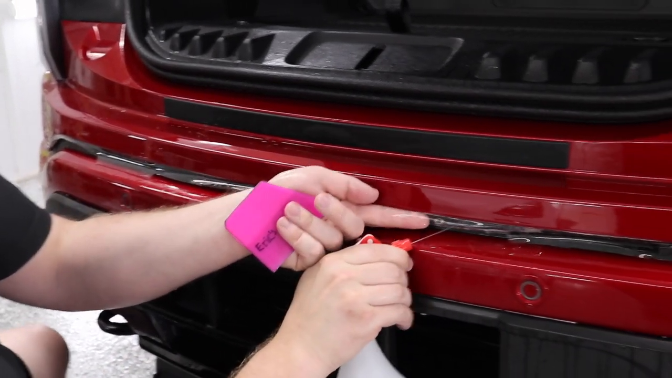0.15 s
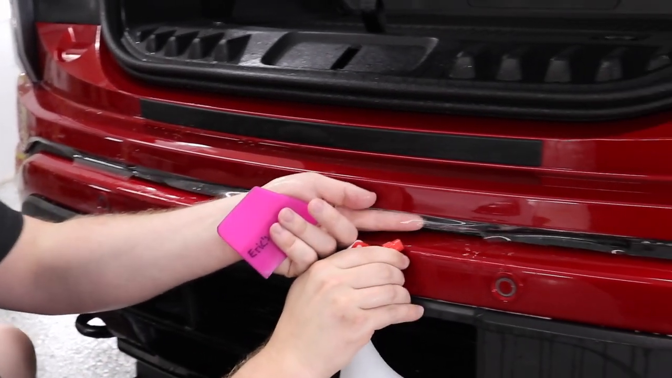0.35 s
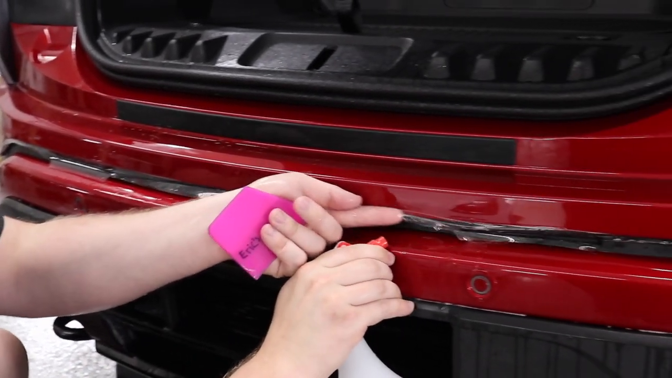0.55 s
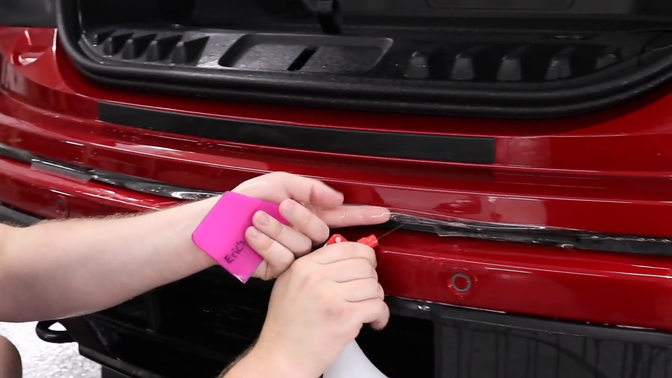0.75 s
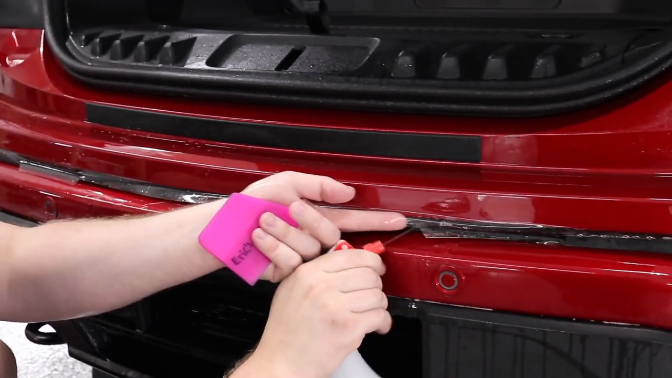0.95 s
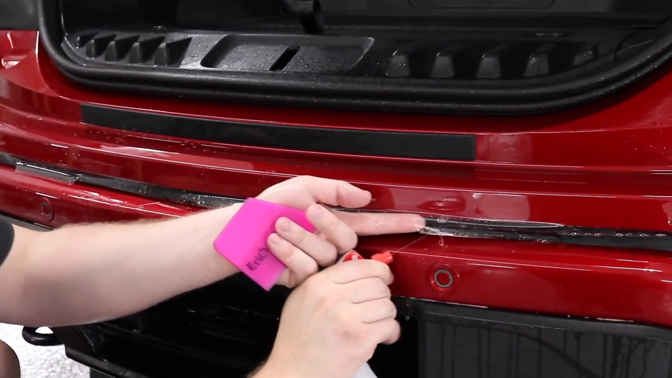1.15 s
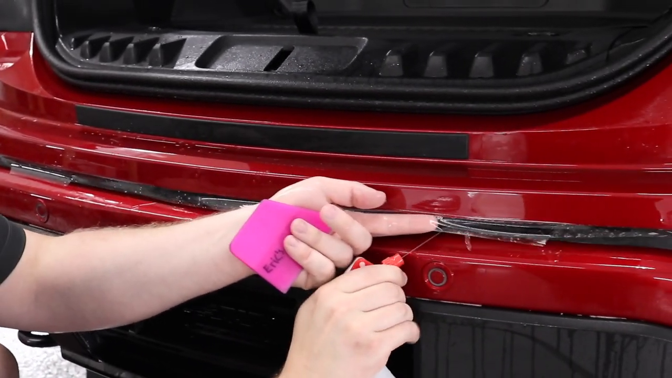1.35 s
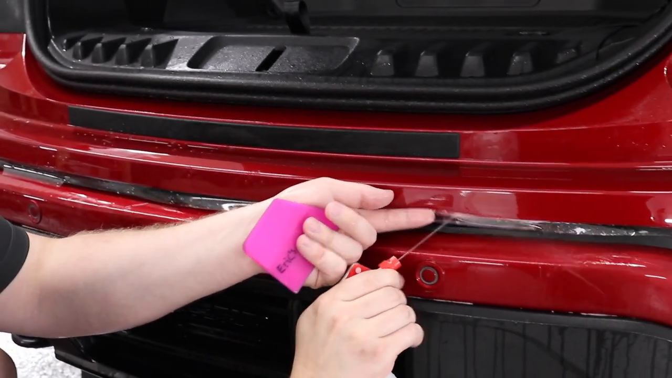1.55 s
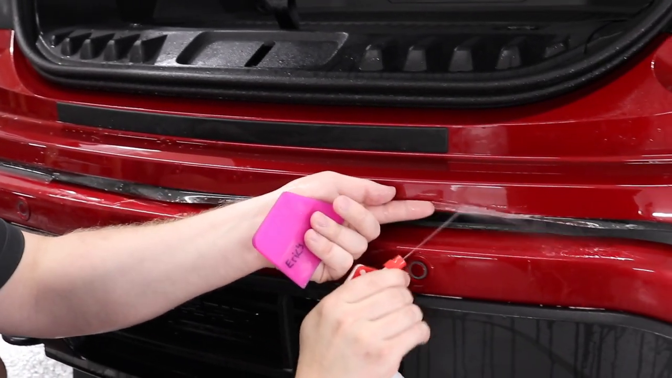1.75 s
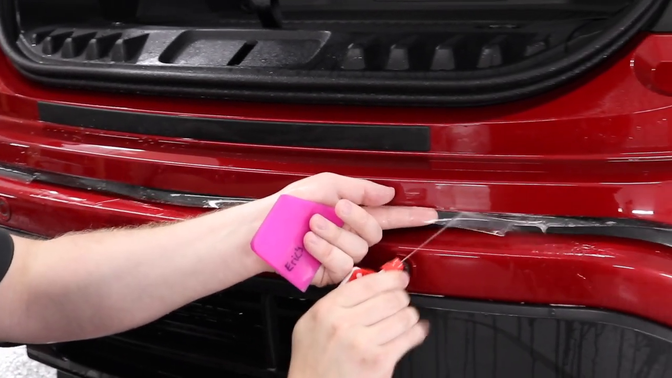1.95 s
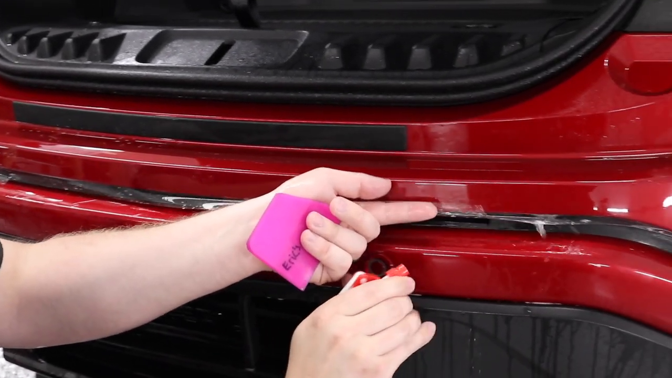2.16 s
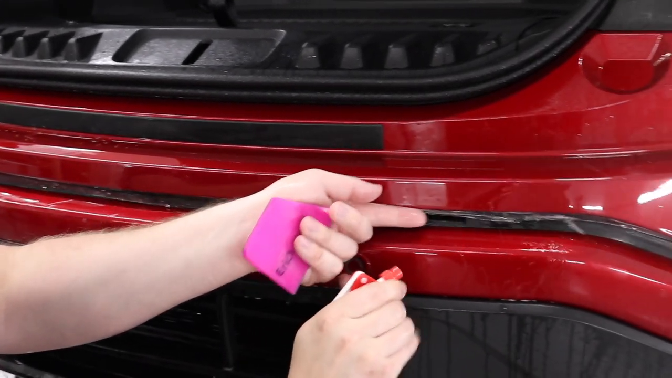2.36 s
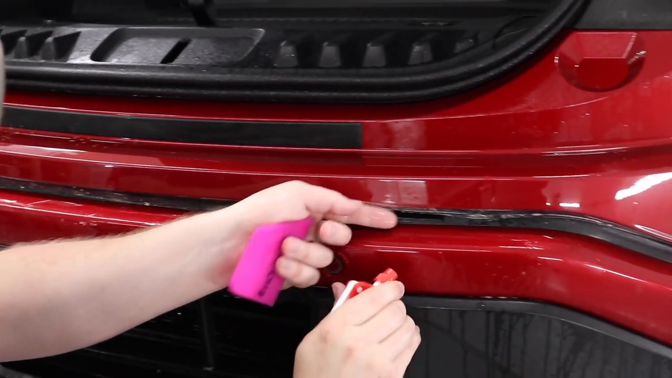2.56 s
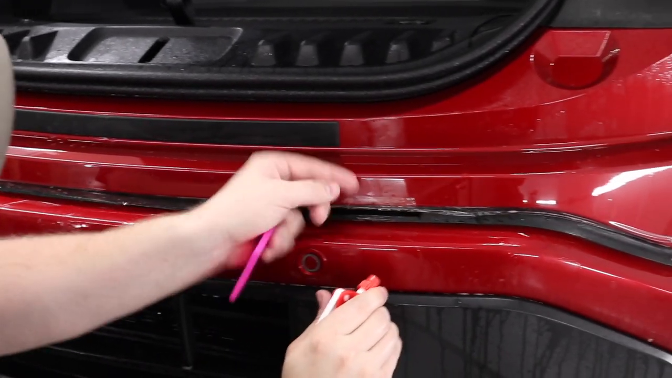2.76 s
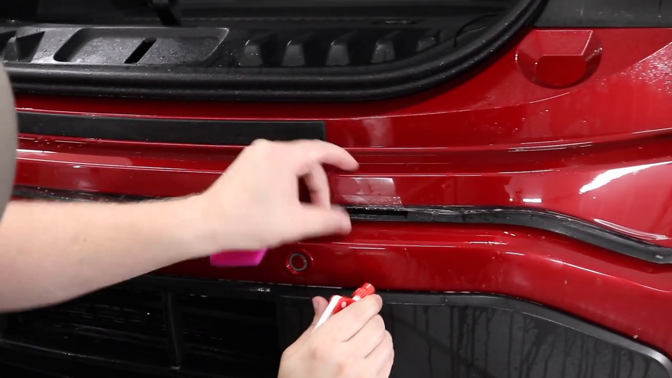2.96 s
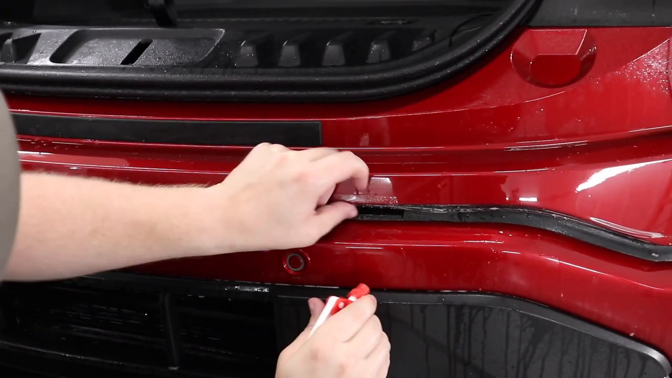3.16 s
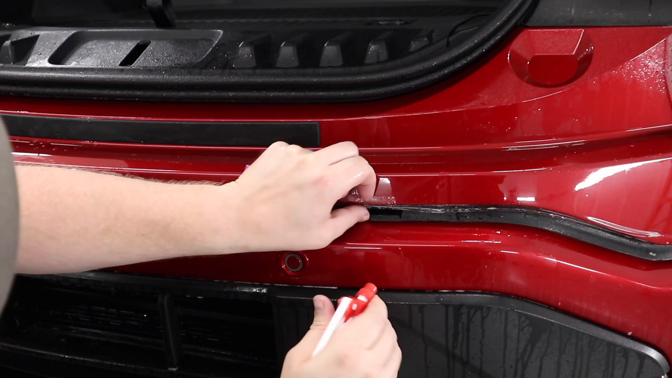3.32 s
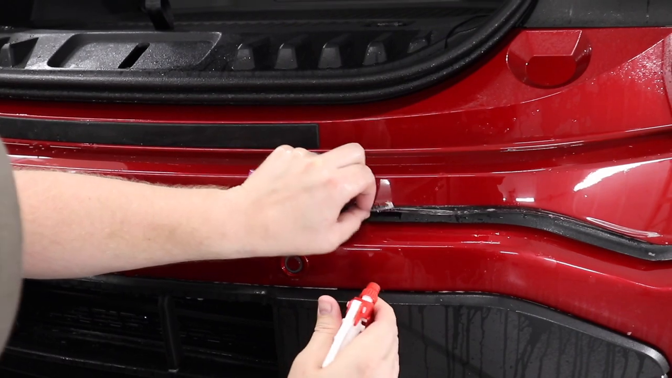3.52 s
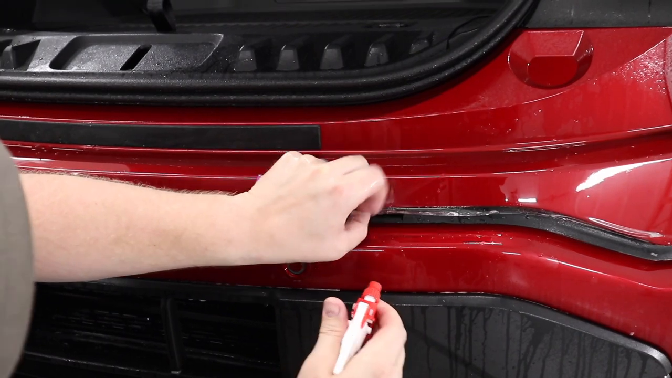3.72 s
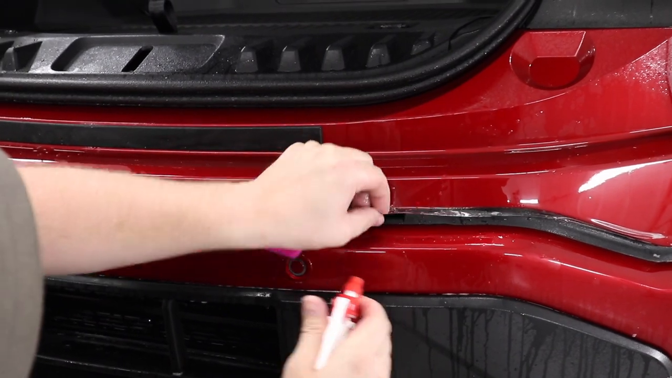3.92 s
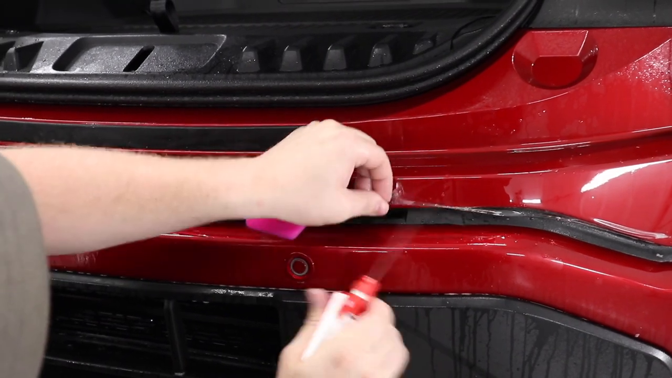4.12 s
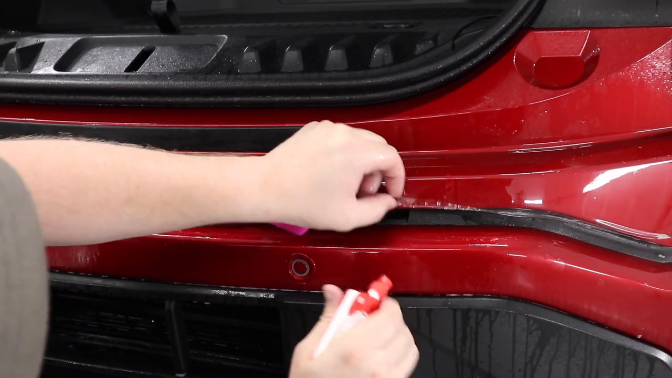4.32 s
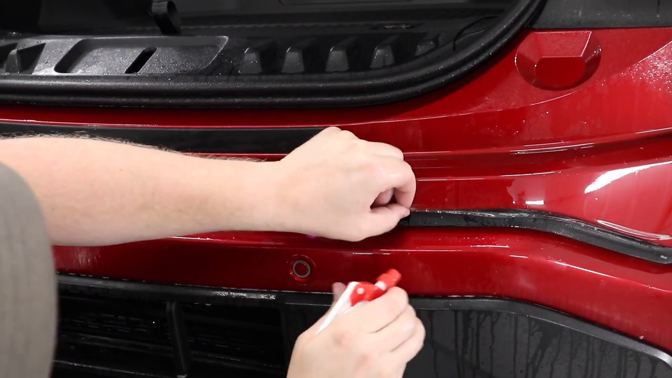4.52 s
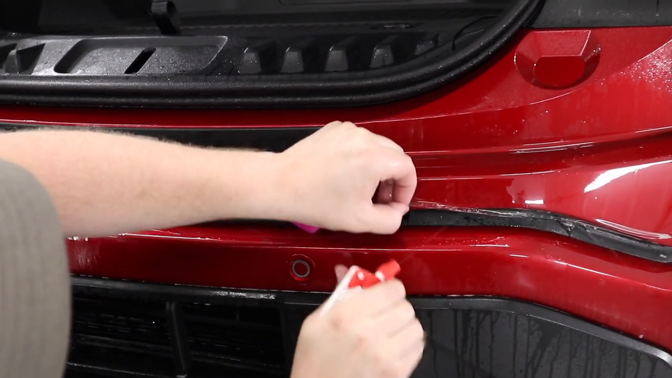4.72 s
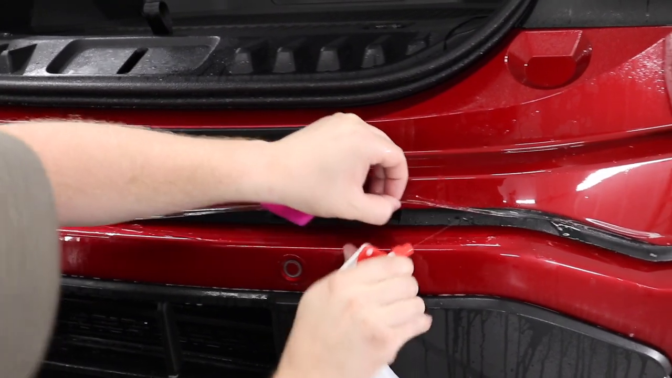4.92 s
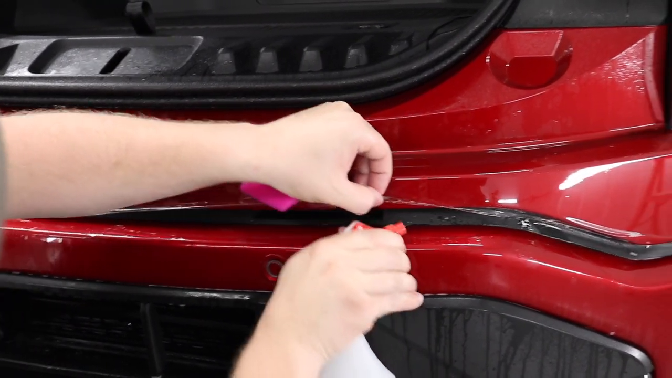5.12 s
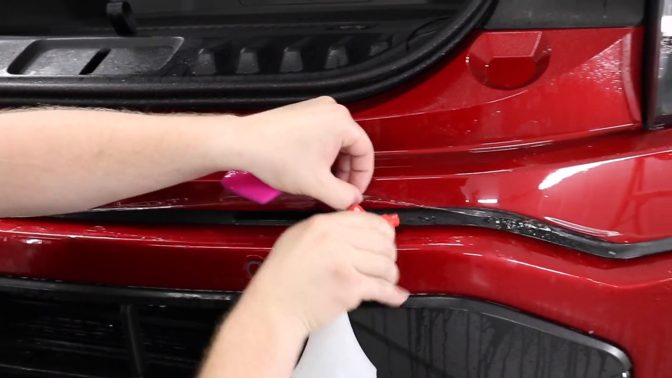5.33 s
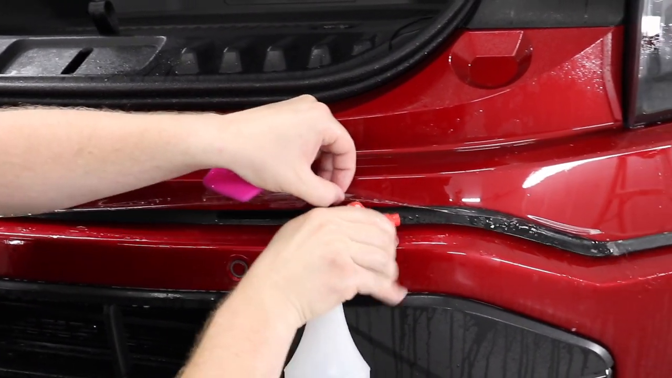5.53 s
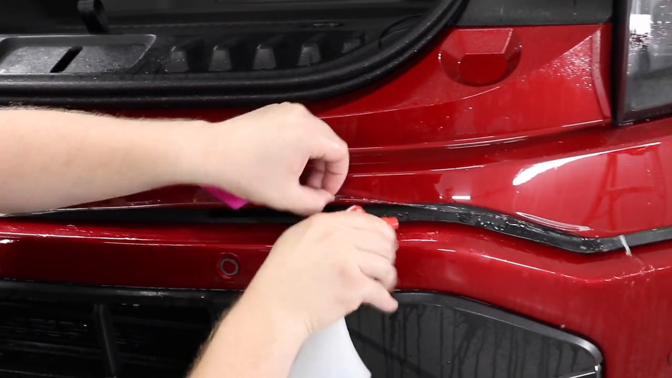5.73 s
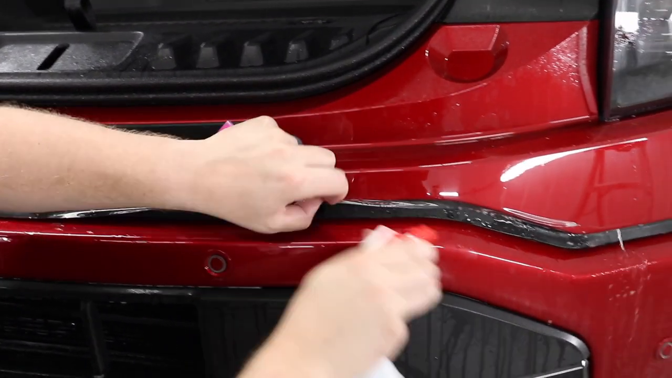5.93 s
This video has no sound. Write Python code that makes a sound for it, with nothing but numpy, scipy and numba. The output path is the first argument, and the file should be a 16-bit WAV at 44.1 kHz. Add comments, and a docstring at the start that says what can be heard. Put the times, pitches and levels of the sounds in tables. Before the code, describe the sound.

In a hard-walled workshop, a squeegee rubs and squeaks over wet film some way off while hands shuffle a plastic bottle. Close to the microphone, the trigger clicks and spits quick wet hisses onto a car panel, about five a second. The spraying pauses for light ticks, resumes in sparser, softer spurts, and ends with squeaks, scrapes, hollow knocks and a small metallic jingle. Faint lamp hum lies beneath.

```python
"""A squeegee scrapes some way off and low shuffles of hands and bottle start the take, over humming lamps.
Close to the microphone a trigger bottle knocks, ticks and sprays short jets at a car panel.
Loose metal jingles, wet rubber squeaks and something whines faintly, all in a hard-walled workshop.
Jets, scrapes and shuffles are shaped noise, knocks and jingles are decaying sines,
ticks are short noise bursts and squeaks are gliding tones with narrow noise."""
import sys
import numpy as np
from scipy import signal
from scipy.fft import rfft, irfft, next_fast_len
from scipy.io import wavfile
from scipy.ndimage import uniform_filter1d, map_coordinates
from numba import njit

SR = 44100
rng = np.random.default_rng(int(sys.argv[2]) if len(sys.argv) > 2 else 0)


def output_pcm(signal):
    """Save a mono or channel-first signal as 16-bit PCM at the path in sys.argv[1].

    Samples are clipped to [-1, 1] before scaling.
    """
    pcm = np.clip(np.atleast_2d(signal).T, -1, 1) * 32767
    wavfile.write(sys.argv[1], SR, np.round(pcm).astype(np.int16))


N = 268128
T = np.arange(N) / SR

# Workshop air. Each row: frequency in Hz, relative density in dB.
AIR_SPECTRUM = [(20, -34.5), (40, -5.5), (100, -2), (250, 3), (500, -7), (1000, -10.5), (1700, -43),
                (2200, -14.5), (3300, -15), (4000, -22.5), (6000, -25.5), (10000, -32), (16000, -40.5)]
AIR_DB = -63
# Lamp hum lines. Each row: frequency in Hz, rms level in dB.
HUM_LINES = [(118.4, -77), (236.9, -74), (1017, -81), (2762, -75), (2821, -78), (3348, -84)]
# Squeegee passes and softer rustles of wet film. Each row: start in s, rise in s, length in s,
# opening relative in dB, fade in dB per s, level in dB, blade resonance in Hz,
# resonance relative in dB, bright edge relative in dB.
SCRAPES = [(0, 0.16, 0.25, -6, 120, -32.5, 1720, -21, -8),
           (0.313, 0.0088, 0.034, -5, 100.5, -29, 1700, -10, -14),
           (0.361, .055, 0.059, -6.5, 200, -29.5, 1920, -26, -8),
           (.513, 0.038, 0.049, -9, 300, -20, 1648, -1.5, -8),
           (0.613, .03, 0.12, -6, 148, -30, 1690, -22, -15),
           (0.756, 0.022, 0.087, -13, 150, -26.5, 1600, -21, -15.5),
           (1.042, 0.11, 0.11, -8, 115, -43, 1766, -25, -7.5),
           (1.275, .05, .06, -6, 140, -50.5, 1840, -30.5, -9),
           (2.439, 0.0086, .015, -18.5, 449, -36, 1250, -18.5, -6),
           (2.5, 0.053, .09, -2.5, 91, -49, 1410, -21.5, -13),
           (2.653, .012, .015, -14, 450.5, -43.5, 1416, -28, 0),
           (2.71, 0.018, .04, -5.5, 30, -57, 1496, -25, -4),
           (5.463, 0.012, 0.026, 0, 500, -42.5, 2050, -6, -16),
           (5.513, 0.044, 0.054, -11, 69, -25.5, 1860, -31, -13.5),
           (5.76, 0.024, 0.029, -8, 503, -28, 1620, -26, -19),
           (5.82, 0.06, 0.063, -4.5, 280, -34, 1900, -20, -11.5),
           (5.954, 0.017, 0.014, -28, 400, -34, 1430, -1, 3),
           (6.009, 0.035, .08, -10, 200, -28.5, 2070, -12, -11)]
# Broad scratch, then bright edge of the blade. Each row: frequency in Hz, relative density in dB.
SCRATCH_SPECTRUM = [(100, -26), (300, -15.5), (600, -7.5), (1300, -3.5), (1900, -2), (2900, 2.5),
                    (4300, -9.5), (7000, -38.5), (12000, -60), (16000, -52)]
EDGE_SPECTRUM = [(1500, -42), (3500, 7.5), (5000, 3), (7000, -9.5), (10000, -21.5), (16000, -46)]
# Low shuffles of hands and liquid in the bottle. Each row: start in s, length in s, level in dB,
# upper rattle relative in dB, thump relative in dB.
SHUFFLES = [(0, 0.04, -40.5, -4, -8), (.045, 0.055, -36.5, -5.5, -13.5), (0.1, 0.092, -40, -4, -13),
            (0.198, 0.1, -37, -4, -15), (0.314, 0.1, -48, 5, -12.5), (1.148, 0.026, -48.5, -2, -25),
            (1.254, 0.23, -60, 2, -6), (1.517, .04, -50, -9, -27), (1.627, 0.027, -52, -12, 0),
            (1.832, 0.06, -51.5, 0.5, -8), (1.917, 0.12, -54, -3, -8), (2.05, 0.076, -52, -1, -8.5),
            (2.116, 0.21, -56, -6, -5.5), (2.332, 0.042, -51, 1.5, -23), (2.423, 0.052, -44, 2.5, -9),
            (2.536, 0.032, -41, -1.5, -10), (2.65, 0.024, -49.5, 2, -18.5), (2.722, 0.14, -55.5, -5, -15),
            (2.878, 0.025, -53.5, 1.5, -16.5), (2.98, 0.028, -55, -10, -20.5),
            (5.934, 0.067, -34.5, -0.5, -11), (5.988, .08, -39, -2, -10)]
# Middle, upper and lowest resonances of the shuffled body.
# Each row: frequency in Hz, width of each filter pass in Hz, relative level in dB.
HOLLOW_MODES = [(433, 184, 2), (536, 150, -4), (290, 180, -9.5)]
RATTLE_MODES = [(829, 230, 0.83), (1198, 150, -1.8)]
THUMP_MODES = [(129, 59, 7), (163, 44, 0.5), (212, 26, -7)]
# Hollow knocks of the bottle and trigger stop. Each row: start in s, peak in dB, pitch in Hz.
KNOCKS = [(.058, -28.5, 440), (.3, -35.5, 373), (1.058, -40.5, 238), (1.189, -41.5, 534), (1.264, -42, 236),
          (1.521, -35, 513), (1.647, -39.5, 453), (1.72, -44.5, 226), (1.864, -39.5, 462),
          (1.958, -36, 1240), (2.059, -40, 524), (2.114, -40, 457), (2.334, -38.5, 444),
          (2.362, -39.5, 546), (2.442, -37, 870), (2.547, -40, 550), (2.614, -38.5, 847), (2.657, -35, 524),
          (2.722, -43, 520), (2.899, -47, 550), (2.985, -43, 329), (3.362, -48, 301), (3.594, -51, 230),
          (4.071, -53, 256), (4.788, -30.5, 530), (4.829, -50, 229), (5.139, -50.5, 382), (5.385, -42, 222),
          (5.579, -34, 606), (5.945, -26.5, 473), (5.968, -25, 493), (6.008, -23, 553)]
# Modes of the hollow plastic. Each row: multiple of the pitch, relative level in dB.
BOTTLE_MODES = [(1, 3), (1.75, -10), (2.35, -8.5)]
# Jolts of small metal parts. Each row: start in s, level in dB before a common trim.
JINGLES = [(0.0787, -49), (2.4444, -45), (2.6614, -50), (5.968, -36), (6.0094, -47), (6.0344, -49),
           (6.0566, -47)]
# Modes of the metal parts. Each row: frequency in Hz, average level in dB, 60 dB decay time in s.
METAL_MODES = [(5000, 0.5, .06), (7480, -0.5, .2), (10500, -3.5, 0.2), (11500, -4, 0.21),
               (13150, -10.5, .08)]
# Ticks of trigger, film and fingers. Each row: start in s, level in dB, centre in Hz,
# treble crack relative in dB.
TICKS = [(.1087, -33, 2380, -8.5), (.128, -32, 7500, -12), (.158, -33, 6200, -20), (.2344, -24, 3330, -27),
         (.2606, -24, 1670, -19), (.283, -28.5, 5500, -22), (0.8626, -22, 1350, -31),
         (1.059, -30.5, 1950, -3), (1.1872, -27.5, 4670, -32), (1.2668, -31, 2690, -7),
         (1.4727, -38, 2770, -9), (1.492, -30, 2690, -19.5), (1.5246, -21.5, 2460, -13),
         (1.724, -32, 3780, -7), (1.867, -23, 4400, -11), (1.9438, -32, 2310, -5),
         (2.1162, -23.5, 4630, -21.5), (2.1964, -37.5, 4300, -4), (2.362, -26, 4320, -20),
         (2.4444, -25, 1180, -19.5), (2.6614, -32.5, 1220, -7), (2.888, -40.5, 890, -19.5),
         (2.9064, -38.5, 3700, -18.5), (3.1964, -46, 1190, -20), (3.2909, -35.5, 2700, -26.5),
         (3.3643, -37.5, 1030, -30.5), (3.3732, -39.5, 2110, -25.5), (3.3814, -38.5, 2720, -17.5),
         (3.5824, -39.5, 3230, -10), (3.599, -46, 964, -25), (3.731, -39.5, 1020, -15),
         (3.7589, -44.5, 1016, -17.5), (3.7827, -44.5, 963, -19.5), (3.803, -46.5, 985, -18),
         (3.8236, -49, 2310, -17.5), (3.9599, -53.5, 1010, -19), (4.076, -37.5, 1060, -12),
         (4.082, -40.5, 2320, -25), (4.5644, -42, 1060, -13), (4.792, -28.5, 1230, -20),
         (4.833, -37.5, 1210, -5), (4.8604, -40, 2300, -11), (4.9174, -37.5, 2760, -20),
         (4.969, -36.5, 2760, -26), (5.04, -49, 2100, -10), (5.142, -38, 1170, -19),
         (5.3879, -32.5, 990, 0.5), (5.578, -40, 9000, 1.5), (5.87, -30, 2600, -24),
         (5.9694, -24, 1370, -14), (6.009, -27, 1010, -22)]
# Trigger strokes; a long pull can spurt twice. Each row: start in s, rise in s, length in s,
# opening relative in dB, nozzle hiss in dB, splash relative in dB, mist relative in dB, echo lag in ms,
# splash peak in Hz, first hiss peak in Hz, second hiss peak in Hz, common level of the peaks in dB.
STROKES = [(.11, 0.014, .06, -20, -41.5, 5.5, -29, 0.74, 2790, 6610, 8680, -18),
           (.665, 0.021, 0.075, 3, -49.5, 14.5, -14, 0.28, 2500, 7400, 11500, -10),
           (.878, .02, 0.073, -1, -57, 12.5, -6, 0.33, 2800, 7600, 11500, -9),
           (1.076, 0.0049, 0.07, -2, -53.5, 13, -2, 0.26, 2730, 7110, 11500, -12),
           (1.285, .01, 0.059, -2, -54, 4.5, -8.5, .27, 2926, 7180, 11500, -6),
           (1.492, 0.084, 0.12, -20, -32, -0.5, -12.5, 0.56, 1500, 6420, 8600, -9.5),
           (1.759, 0.032, 0.068, -16, -34, -0.5, -11.5, 0.52, 2487, 6670, 11020, -5.5),
           (1.957, 0.035, 0.096, -4, -33.5, 1.5, -14.5, 0.52, 2493, 6570, 8800, -1.5),
           (2.216, 0.011, .025, -5, -28.5, -13.5, -12.5, .25, 2390, 7000, 5440, -0.5),
           (2.248, 0.0053, 0.041, -3, -33.5, -4.5, -14, 0.32, 2295, 4750, 9250, -4.5),
           (4.114, .03, 0.13, -5, -40.5, 1.5, -2.5, 0.33, 2390, 5100, 7000, -9),
           (4.196, 0.0081, 0.054, -4, -36.5, -5.5, -4.5, 0.37, 2830, 7450, 9370, 2.5),
           (4.603, 0.058, 0.084, -4.5, -42.5, 8.5, -6, 0.41, 2406, 7150, 8750, -9.5),
           (4.857, 0.0052, .01, -5, -50, 2.5, -10, .4, 2404, 7200, 8670, -10),
           (5.169, 0.054, 0.095, -18, -44.5, 5.5, -8.5, .41, 2160, 5250, 8660, -7.5),
           (5.4, 0.027, 0.049, -4, -44, -2.5, -10, .24, 2457, 8530, 9600, -4),
           (5.583, 0.027, 0.08, -4, -46.5, 14, -12, 0.34, 2683, 8520, 11870, -14),
           (5.965, 0.0054, 0.14, -3, -51, 11, -16, 1.0, 2445, 4870, 7500, -.5)]
# Nozzle hiss, fine mist and splash on the panel. Each row: frequency in Hz, relative density in dB.
HISS_SPECTRUM = [(500, -47.5), (2500, -19.5), (4000, 6), (6000, 3), (8000, 3), (10000, -5), (12000, -19),
                 (15000, -36)]
MIST_SPECTRUM = [(3000, -61), (7000, -24.5), (10000, 0), (12000, 2), (14500, -8.5), (16000, -10.5)]
SPLASH_SPECTRUM = [(100, -45.5), (300, -12), (700, -6.5), (1200, -1), (1600, -5.5), (2500, 0.5), (3500, -7),
                   (5000, -21.5), (7000, -35), (12000, -48)]
# Brief squeaks of rubber and wet fingers. Each row: start in s, length in s, first pitch in Hz,
# last pitch in Hz, level in dB.
SQUEAKS = [(0.356, 0.038, 1980, 1990, -36), (0.407, 0.026, 1503, 1440, -31.5),
           (0.517, 0.068, 3180, 2960, -24), (2.973, 0.065, 389, 280, -50.5), (5.56, 0.029, 1734, 1770, -31),
           (5.786, 0.066, 1190, 1180, -33), (5.783, 0.023, 2484, 2460, -30.5),
           (5.794, 0.023, 1647, 1650, -35), (5.815, 0.044, 4110, 4420, -36),
           (5.865, 0.018, 4100, 4420, -53)]
# Faint high whine swells. Each row: start in s, rise in s, length in s, opening relative in dB,
# fade in dB per s, level in dB.
WHINES = [(3.27, 0.15, 0.35, -8, 44, -63.5), (4.28, .01, 0.27, 8, 24, -62)]
# Decay of the workshop. Each row: frequency in Hz, 60 dB decay time in s.
SHOP_T60 = [(100, 2.4), (500, 1.45), (2000, 1.44), (5000, 1.4), (10000, 0.63), (16000, 0.84)]

OPEN_S = 0.0064  # every noise event opens over this time, unless it starts at zero
SHUFFLE_RISE_S, SHUFFLE_OPEN_DB, SHUFFLE_FADE_DB_S = 0.018, -12.5, 220.5
KNOCK_T60_S, TICK_T60_S, CRACK_T60_S = 0.058, 0.015, 0.0086
SNAP_HZ, SNAP_DB = 2800, -7  # every tick also snaps over a wide band
JET_SAG_DB_S, JET_FADE_DB_S = 32.5, 601  # pressure sags while held, dies on release
SPLASH_FADE_DB_S = 350  # droplets keep landing after the nozzle shuts
WHINE_HZ, WHINE_WIDTH_HZ, WHINE_GLIDE_HZ, GLIDE_S = 4980, 310, 120, 0.16
# sends into the workshop
NEAR_WET_DB, FAR_WET_DB, SHUFFLE_WET_DB, KNOCK_WET_DB = -9.5, -8.5, -14, -21
TOP_HZ = 15900


def undb(db):
    """Decibels to gain."""
    return 10 ** (np.asarray(db) / 20)


def unit(x):
    """Scale to rms 1."""
    return x / np.sqrt(np.mean(x ** 2))


def decay(t, t60):
    """Exponential decay that falls 60 dB in t60 seconds."""
    return np.exp(-np.log(1000) * t / t60)


def colour(x, shape):
    """Filter x by a curve of (Hz, dB) points; rms 1."""
    hz, db = np.transpose(shape)
    size = next_fast_len(len(x))
    f = np.maximum(np.arange(size // 2 + 1) * SR / size, 1)
    gain = undb(np.interp(np.log(f), np.log(hz), db))
    return unit(irfft(rfft(x, size) * gain, size)[:len(x)])


@njit
def svf(x, hz, width):
    """State-variable band-pass with a moving centre, gain 1 at the centre."""
    y, band, low = np.empty(len(x)), 0., 0.
    for i in range(len(x)):
        g, k = np.tan(np.pi * hz[i] / SR), width / hz[i]
        v = (band + g * (x[i] - low)) / (1 + g * (g + k))
        band, low, y[i] = 2 * v - band, low + 2 * g * v, k * v
    return y


def steep(x, hz, width):
    """A band-pass applied twice, for steeper sides; rms 1."""
    hz = hz + np.zeros(len(x))
    return unit(svf(svf(x, hz, width), hz, width))


def play(start, rise, length, open_db, fade_db_s, sag_db_s=0.):
    """One gain column per event: opens quickly, rises, holds while sagging, then fades."""
    t = T[::8, None] - start  # gains are stepped every 8 samples
    db = open_db * np.clip(1 - t / rise, 0, 1)
    db = db - sag_db_s * np.maximum(t - rise, 0)
    db = db - fade_db_s * np.maximum(t - length, 0)
    opening = np.clip(t / OPEN_S + (start == 0), 0, 1)
    return np.repeat(opening * undb(db), 8, axis=0)[:N]


def grainy(rate, spread_db):
    """Noise with a level redrawn rate times a second and smoothed, like uneven droplets or slips."""
    k = max(int(SR / rate), 1)
    jumps = np.repeat(rng.standard_normal(N // k + 1), k)[:N]
    return rng.standard_normal(N) * undb(spread_db * uniform_filter1d(jumps, k))


def add(out, s, sound):
    """Mix a short sound in at time s."""
    i = int(s * SR)
    out[i:i + len(sound)] += sound[:N - i]


def background():
    """The floor of the place: slowly wavering air noise and steady sine lines of lamp hum."""
    air = undb(AIR_DB) * colour(grainy(3.6, 1.1), AIR_SPECTRUM)
    hum = np.zeros(N)
    for hz, db in HUM_LINES:
        hum += undb(db) * np.sqrt(2) * np.sin(2 * np.pi * (hz * T + rng.random()))
    return air + hum


def squeegee():
    """Dense slips of the far blade: a broad scratch, a bright edge and a moving resonance."""
    *shape, db, ring_hz, ring_db, edge_db = np.transpose(SCRAPES)
    gains = play(*shape) * undb(db)
    slips = grainy(150., 1.1)
    scratch = colour(slips, SCRATCH_SPECTRUM)
    edge = colour(grainy(150., 2.6), EDGE_SPECTRUM)
    # the loudest pass sets the resonance
    ring = steep(slips, ring_hz[gains.argmax(axis=1)], 620.)
    return 0.61 * gains.sum(axis=1) * scratch + gains @ undb(edge_db) * edge + gains @ undb(ring_db) * ring


def body_ring(noise, modes):
    """Noise through the resonances of a hollow body; rms 1."""
    return unit(sum(undb(db) * steep(noise, hz, 1. * width) for hz, width, db in modes))


def shuffle():
    """Low lumpy rubbing and sloshing through the resonances of a hollow body."""
    s, length, db, rattle_db, thump_db = np.transpose(SHUFFLES)
    gains = play(s, SHUFFLE_RISE_S, length, SHUFFLE_OPEN_DB, SHUFFLE_FADE_DB_S) * undb(db)
    lumps = grainy(90., 3.0)
    hollow = gains.sum(axis=1) * body_ring(lumps, HOLLOW_MODES)
    rattle = gains @ undb(rattle_db) * body_ring(lumps, RATTLE_MODES)
    thump = gains @ undb(thump_db) * body_ring(lumps, THUMP_MODES)
    return hollow + rattle + thump


def knocks():
    """A soft push rings the hollow plastic modes; higher modes die sooner."""
    out, t = np.zeros(N), T[:8192]
    for s, db, hz in KNOCKS:
        ring = np.zeros(len(t))
        for multiple, mode_db in BOTTLE_MODES:
            tone = np.sin(2 * np.pi * multiple * hz * t)
            ring += undb(mode_db) * tone * decay(t, KNOCK_T60_S / np.sqrt(multiple))
        ring = ring * (1 - np.exp(-t / 0.0054))
        add(out, s, undb(db) * ring / np.abs(ring).max())
    return out


def jingles():
    """Each jolt rings the metal modes with new weights; loose contact roughens the ring."""
    out, t = np.zeros(N), T[:16384]
    weights = rng.standard_normal((len(JINGLES), len(METAL_MODES)))
    for (s, db), weight in zip(JINGLES, weights):
        ring = np.zeros(len(t))
        for (hz, mode_db, t60), w in zip(METAL_MODES, weight):
            ring += undb(mode_db + 2.5 * w) * np.sin(2 * np.pi * hz * t) * decay(t, t60)
        add(out, s, undb(db) * 0.22 * ring * (1 - np.exp(-t / 0.0025)))
    roughness = unit(uniform_filter1d(rng.standard_normal(N), size=300))
    return out * (1 + .6 * roughness)


def ticks():
    """Short bursts of noise: a body round a centre, a wide snap and a quick treble crack."""
    out, t = np.zeros(N), T[:4096]
    fall = decay(t, TICK_T60_S)
    noises = rng.standard_normal((len(TICKS), len(t)))
    for (s, db, hz, crack_db), noise in zip(TICKS, noises):
        body = steep(noise * (1 - np.exp(-t / .0006)) * fall, hz, 0.89 * hz)
        # reversed noise keeps the snap independent of the body
        body = body + undb(SNAP_DB) * steep(noise[::-1] * fall, SNAP_HZ, 4500.)
        crack = steep(noise * decay(t, CRACK_T60_S), 9000., 8000.)
        tick = 0.75 * body / np.abs(body).max() + undb(crack_db) * crack / np.abs(crack).max()
        add(out, s, undb(db) * tick)
    return out


def spray():
    """Nozzle hiss, fine mist and splashing droplets; a nearby echo combs them and three peaks ring."""
    s, rise, length, open_db, db, splash_db, *aim = np.transpose(STROKES)
    gains = play(s, rise, length, open_db, JET_FADE_DB_S, JET_SAG_DB_S) * undb(db)
    flow = gains.max(axis=1)
    splashes = play(s, rise, length, open_db, SPLASH_FADE_DB_S, JET_SAG_DB_S) * undb(db + splash_db)
    landing = splashes.max(axis=1)
    # the loudest stroke sets mist, echo and peaks
    loudest = gains.argmax(axis=1)
    mist_db, lag_ms, splash_hz, hiss1_hz, hiss2_hz, peak_db = (column[loudest] for column in aim)

    air, drops = grainy(300., 2.2), grainy(200., 2.3)
    hiss_and_mist = colour(air, HISS_SPECTRUM) + undb(mist_db) * colour(air, MIST_SPECTRUM)
    jet = flow * hiss_and_mist + landing * colour(drops, SPLASH_SPECTRUM)
    echo = map_coordinates(jet, [np.arange(N) - lag_ms * SR / 1000], order=3)
    # each peak sputters on its own as the jet breaks up
    peaks = flow * steep(grainy(70., 2.4), hiss1_hz, 800.)
    peaks += 0.64 * flow * steep(grainy(64., 2.4), hiss2_hz, 700.)
    peaks += 1.3 * landing * steep(grainy(60., 5.0), splash_hz, 410.)
    peaks *= undb(peak_db)
    # the walls hear the jet from all sides, so mostly without the local colour
    return jet + 0.26 * echo + peaks, jet + .3 * peaks


def squeaks():
    """Stick-slip squeaks: a clean gliding tone mixed with narrow noise on the same glide."""
    out = np.zeros(N)
    for (s, length, hz0, hz1, db), noise in zip(SQUEAKS, rng.standard_normal((len(SQUEAKS), 4096))):
        n = int(length * SR)
        hz = np.linspace(hz0, hz1, n)
        clean = np.sin(2 * np.pi * np.cumsum(hz) / SR)
        tone = 0.82 * clean + 0.83 * steep(noise[:n], hz, 0.11 * hz0)
        add(out, s, undb(db) * np.sqrt(np.hanning(n)) * tone)
    return out


def whine():
    """A narrow band of noise that swells faintly, each swell sliding up to pitch."""
    *shape, db = np.transpose(WHINES)
    starts = shape[0]
    since = T - starts[np.maximum(np.searchsorted(starts, T) - 1, 0)]
    hz = WHINE_HZ - WHINE_GLIDE_HZ * np.exp(-np.abs(since) / GLIDE_S)
    return play(*shape) @ undb(db) * steep(rng.standard_normal(N), hz, 1. * WHINE_WIDTH_HZ)


def shop(x):
    """Diffuse reverberation off hard walls: noise whose decay time depends on frequency."""
    f, t, z = signal.stft(rng.standard_normal(2 * SR), SR, nperseg=256)
    hz, t60 = np.transpose(SHOP_T60)
    z = z * decay(t, np.interp(f, hz, t60)[:, None])
    tail = signal.istft(z, SR, nperseg=256)[1]
    tail = tail * np.clip(np.arange(len(tail)) / SR / 0.0041, 0, 1)  # fades in over 4.1 ms
    return signal.fftconvolve(x, tail / np.sqrt(np.sum(tail ** 2)))[:N]


def scene():
    """Near bottle, far squeegee, the room and its floor."""
    far, low, tick = squeegee(), shuffle(), ticks()
    rings = knocks() + jingles() + squeaks()
    jet, jet_to_walls = spray()
    wet = undb(NEAR_WET_DB) * (jet_to_walls + tick) + undb(FAR_WET_DB) * far
    wet += undb(SHUFFLE_WET_DB) * low + undb(KNOCK_WET_DB) * rings
    direct = jet + tick + far + low + rings
    return (direct + shop(wet) + background() + whine())[None]


def record(dry):
    """The recorder cuts the top with a steep low-pass."""
    return signal.sosfilt(signal.ellip(10, .2, 70, TOP_HZ, fs=SR, output="sos"), dry)


dry = scene()
out = record(dry)
output_pcm(out)
```